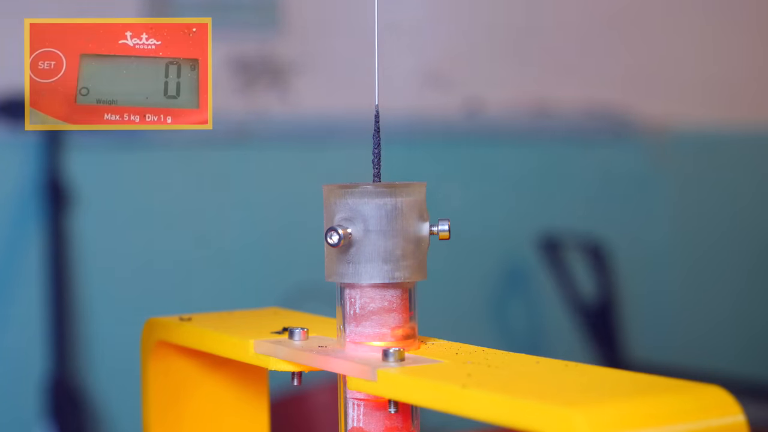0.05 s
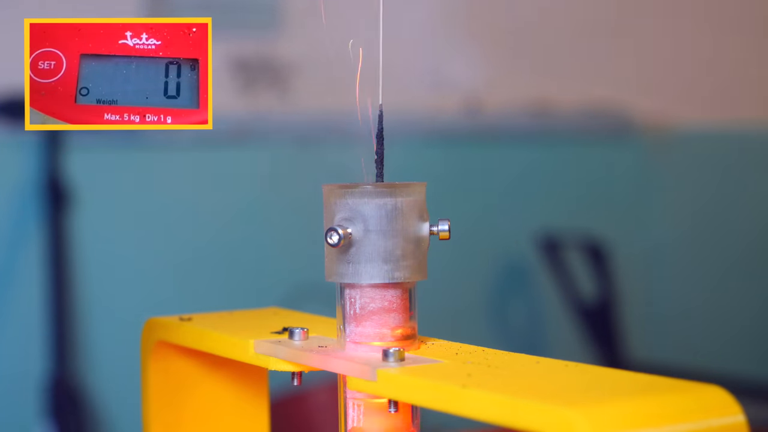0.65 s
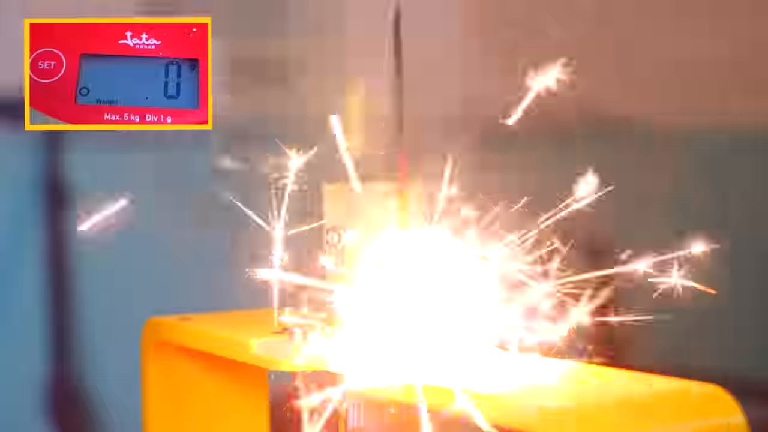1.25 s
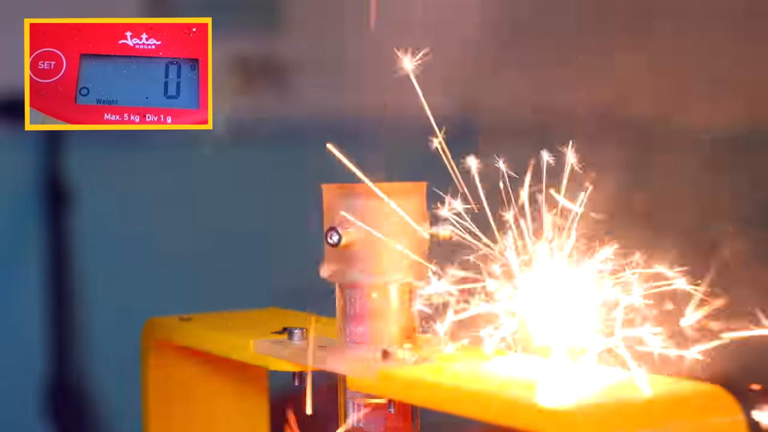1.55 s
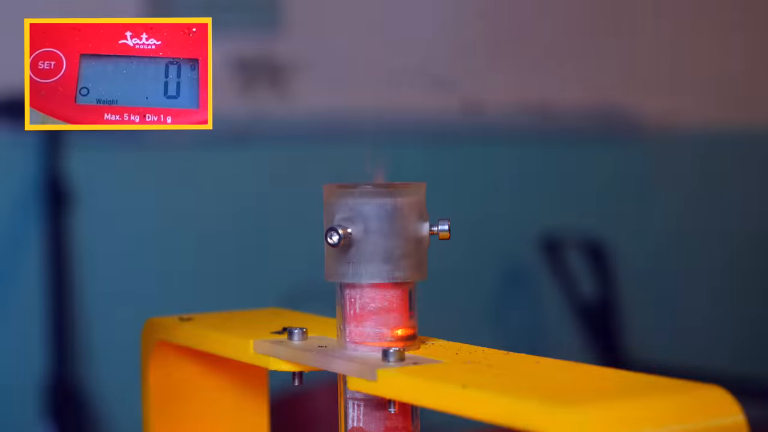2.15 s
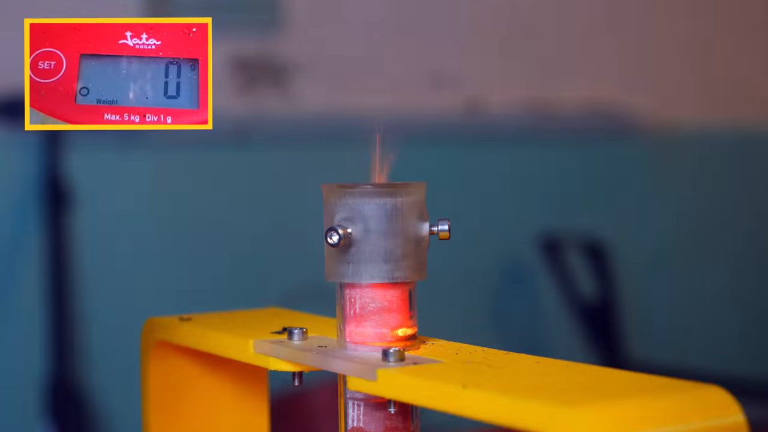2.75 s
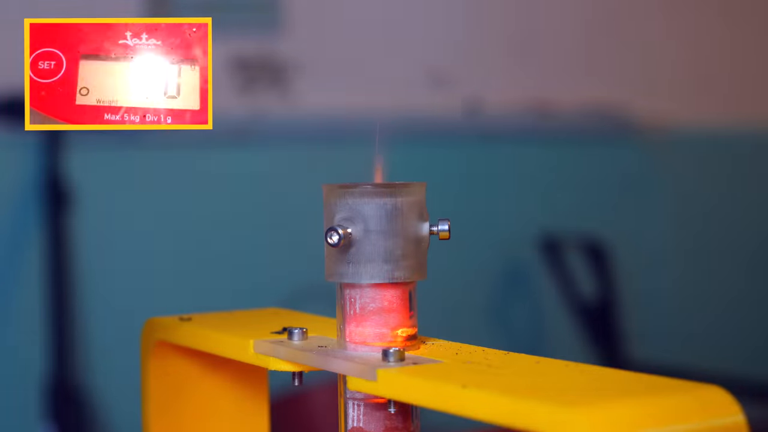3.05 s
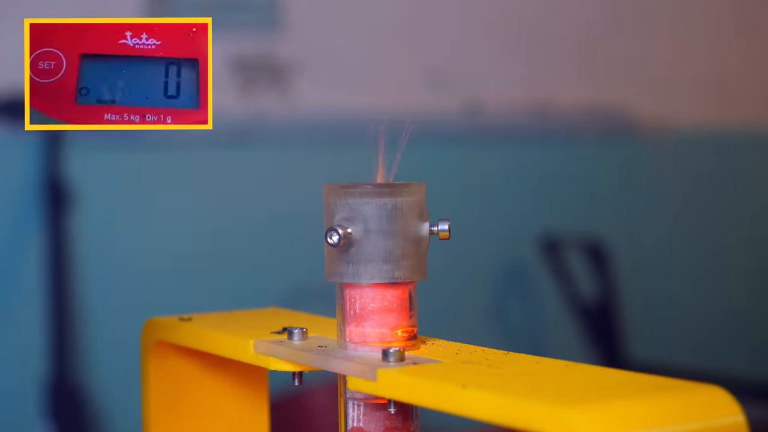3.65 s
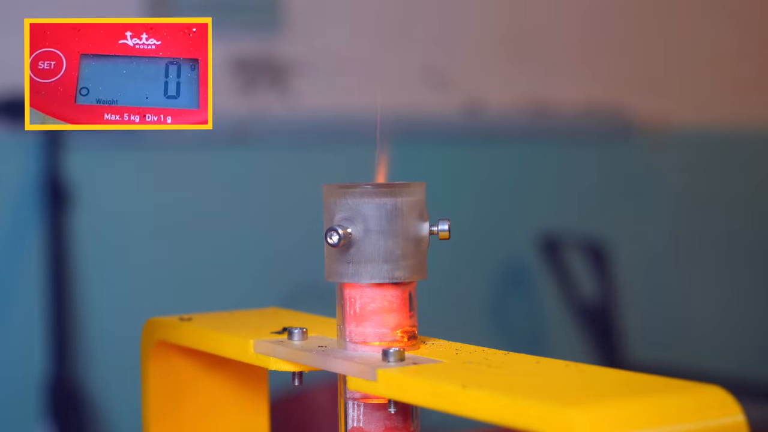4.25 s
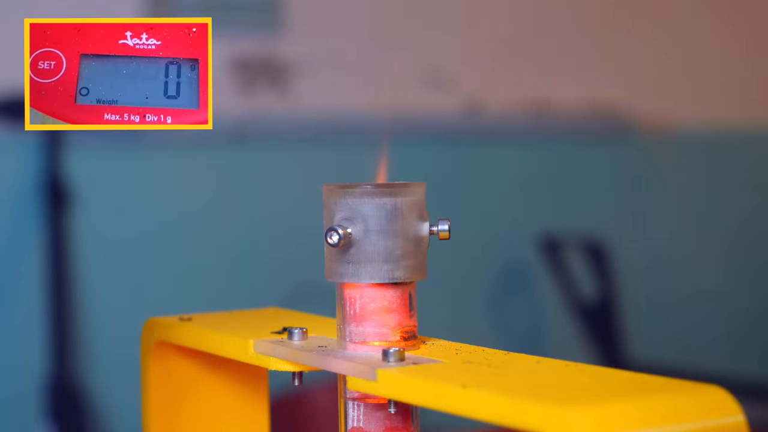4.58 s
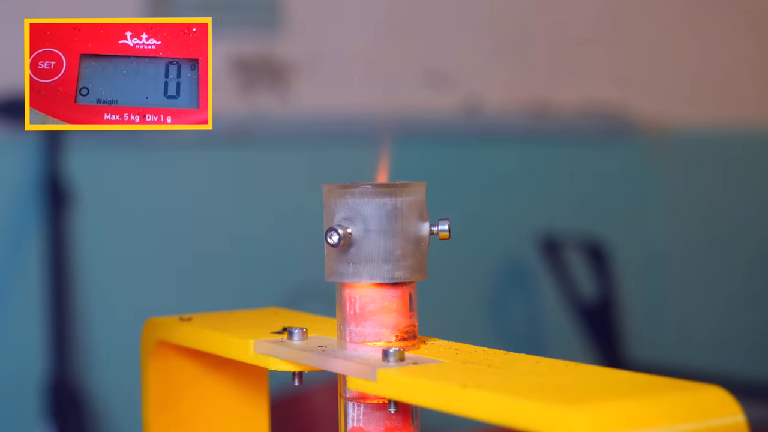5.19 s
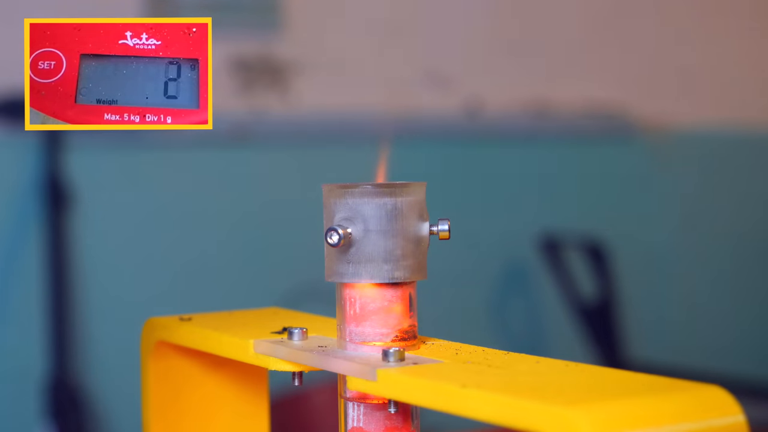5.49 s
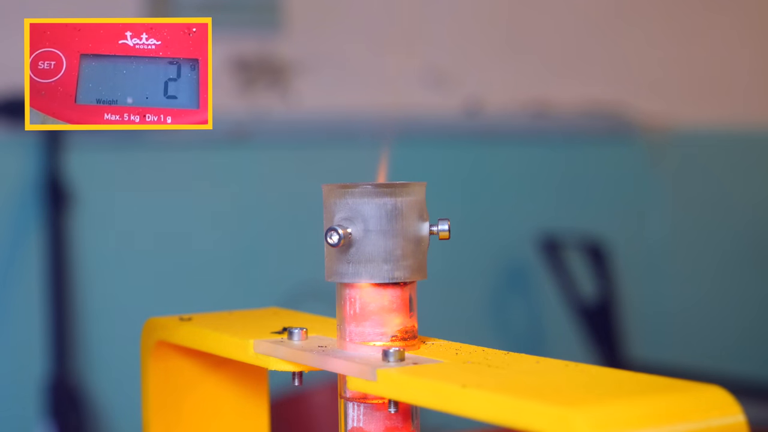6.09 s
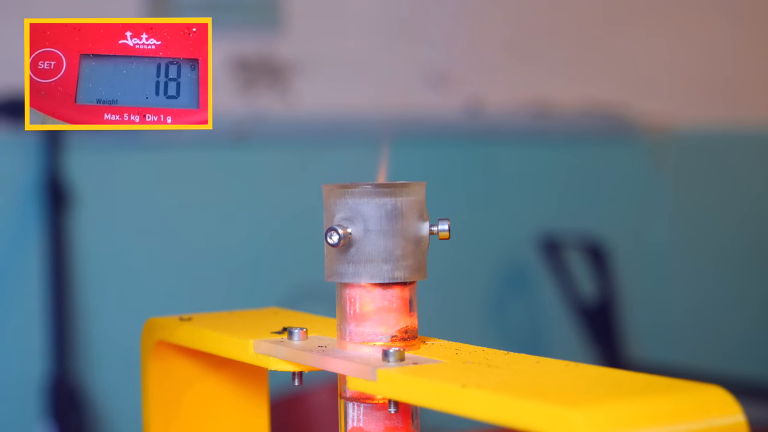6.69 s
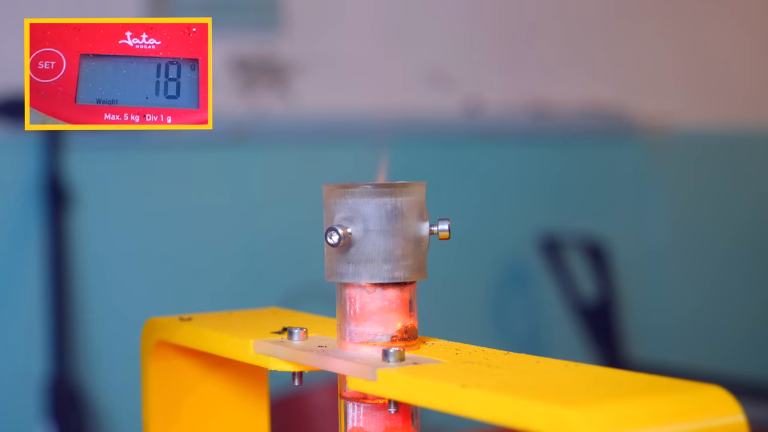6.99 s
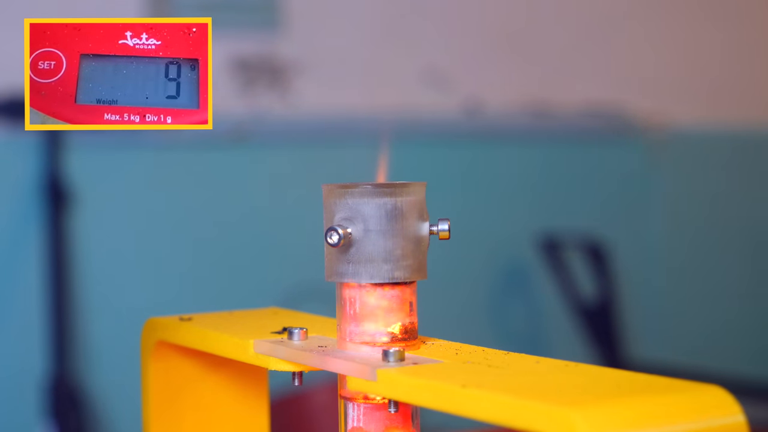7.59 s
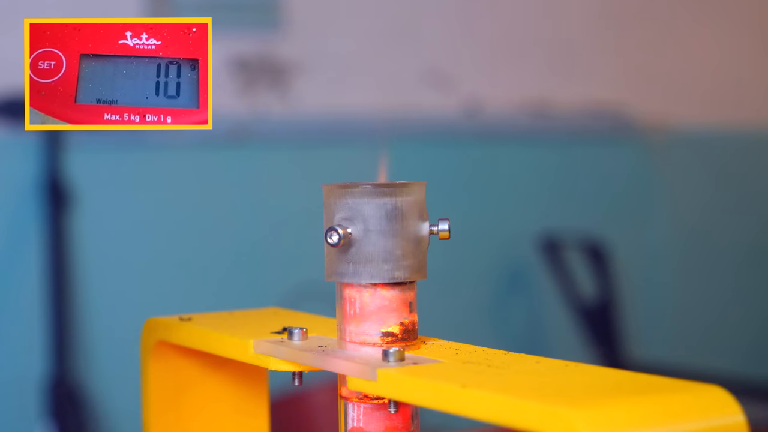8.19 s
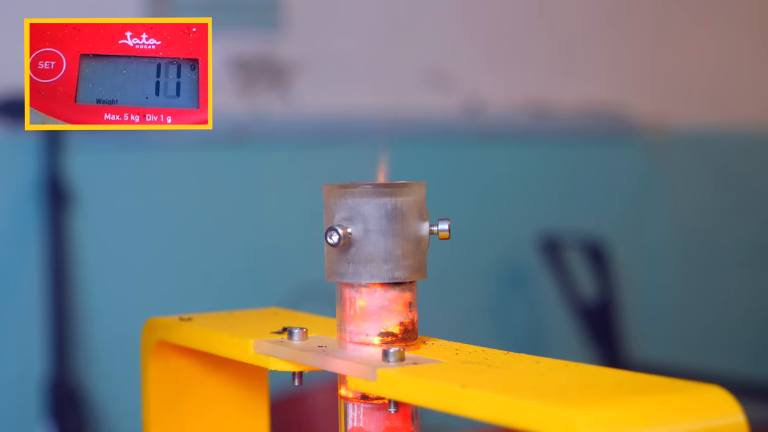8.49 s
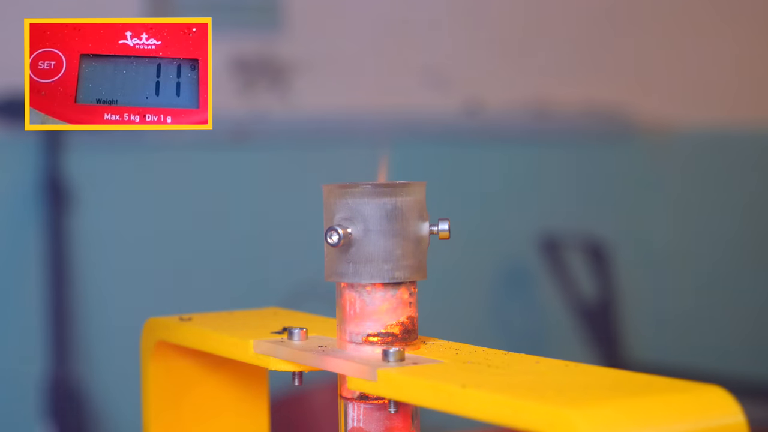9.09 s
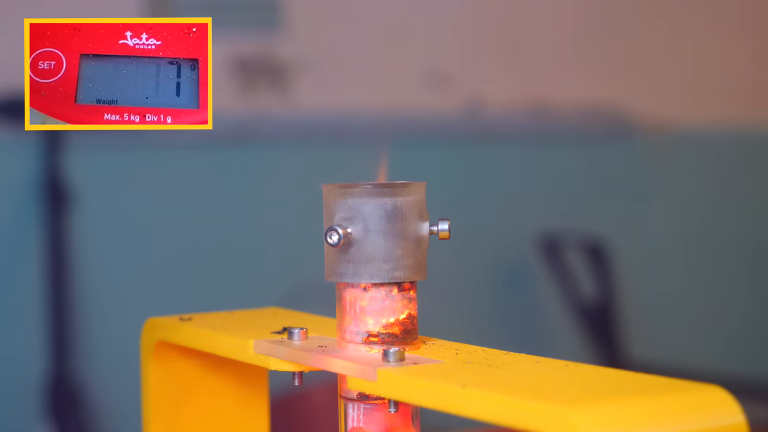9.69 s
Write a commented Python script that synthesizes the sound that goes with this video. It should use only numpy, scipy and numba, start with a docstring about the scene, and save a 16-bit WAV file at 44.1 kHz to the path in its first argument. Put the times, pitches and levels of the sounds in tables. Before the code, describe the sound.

In a workshop with a quiet machine hum, a close mono microphone picks up a spluttering fuse, a soft flutter of ignition and two small metallic ticks. The small rocket motor then burns with a hiss that grows brighter and louder, swelling and easing in slow waves. A hollow tone from the casing follows the swells, and irregular spits and sharp snaps break through.

```python
"""A small solid rocket motor burns weakly on a test stand, its jet hissing in slow surges.
Molten slag sputters and spits in the casing, whose hollow note rises with the gas flow.
Before that, a fuse fizzes down into the nozzle, the grain lights with a soft flutter,
and two bits of debris tick on the stand. The place is a humming workshop with short, weak echoes;
one microphone stands close to the motor, in mono."""
import sys
import numpy as np
from scipy import signal
from scipy.fft import rfft, irfft, next_fast_len
from scipy.io import wavfile
from scipy.ndimage import map_coordinates
from numba import njit

SR = 44100
rng = np.random.default_rng(int(sys.argv[2]) if len(sys.argv) > 2 else 0)


def store_wav(level_fs):
    """Save 16-bit WAV to argv[1]."""
    pcm = np.round(np.clip(np.atleast_2d(level_fs), -1, 1) * 32767)
    wavfile.write(sys.argv[1], SR, pcm.T.astype(np.int16))


N = 433944

# machine hum in the workshop: f/Hz, rms level/dB
MACHINE_HUM = [(59.2, -74.5), (183, -72), (306.8, -72), (399.5, -66.5), (430.7, -71.5)]
# bands where direct sound and the stand's reflections cancel: f/Hz, half width/Hz, gain/dB
STAND_DIPS = [(1800, 110, -2.5), (2500, 83, -1.5), (3060, 96, -2.5), (3650, 49, -2.5), (4770, 410, -8.5),
              (5360, 310, -6), (6434, 250, -6.5), (7800, 240, -3), (9360, 520, -4), (11550, 1140, -4),
              (14660, 430, -4)]
# debris striking the stand: t/s, relative level/dB of crack, of plate, of screw
DEBRIS_TICKS = [(1.349, -32.5, -32.5, -67.5), (1.6632, -38, -58, -36)]
# what the debris sets ringing: f/Hz, relative level/dB, t60/s
PLATE_MODES = [(1150, 4.5, 0.033), (1790, -5.5, .025), (2050, -4, .025), (3190, -1, 0.034),
               (4030, 5, 0.026)]
SCREW_MODES = [(3300, -3, .03), (6890, -4, 0.064), (8900, -5, .07)]
# fuse spurts, the last two as it flares in the nozzle: t/s, relative level/dB, half width/s
FUSE_SPURTS = [(.09, -60.5, 0.05), (.405, -51.5, 0.024), (.52, -50.5, 0.027), (.66, -49, .018),
               (.76, -53, 0.02), (.855, -45, 0.016), (.94, -45, .022), (1.07, -37.5, 0.06),
               (1.19, -43.5, 0.066)]
# gas puffs as the grain lights: t/s, relative level/dB, half width/s
IGNITION_PUFFS = [(1.1476, -29, 0.0012), (1.1584, -29, 0.0014), (1.1657, -30, 0.001), (1.18, -36, 0.0017),
                  (1.1965, -36, 0.0018), (1.207, -43, .004)]
# slag spat through the nozzle: t/s, relative level/dB of dull pop, of sharp snap
SLAG_SPITS = [(.977, -45, -50), (2.834, -34, -42), (3.024, -32, -39), (3.621, -38, -40), (3.711, -35, -36),
              (3.943, -37, -45), (4.212, -32, -45), (4.596, -26, -28), (4.604, -35, -38), (4.997, -50, -16),
              (5.052, -32, -38), (5.215, -26.5, -26), (6.035, -49, -24), (6.118, -43, -45),
              (6.869, -33, -40), (7.389, -30, -26), (7.704, -31, -40), (8.613, -42, -20), (8.625, -33, -18)]
# slow drift of the casing's note, flat and sharp: t/s, offset/Hz
NOTE_DRIFT = [(2, -4), (4.4, -90), (5.3, 50), (6.5, -130), (7.7, 18), (8.7, 55), (9.8, -22)]
# gas flow from the burning grain, driving hiss, casing note, roar and sputter: t/s, level/dB
GRAIN_FLOW = [(1.75, -45.5), (1.97, -44), (2.36, -46.5), (2.79, -41), (3.48, -39), (4.54, -28), (4.77, -31),
              (5.26, -26), (5.67, -30.5), (6.5, -26.5), (7.11, -31), (7.74, -23), (7.97, -24.5),
              (8.15, -30.5), (8.37, -33), (9.03, -31.5), (9.52, -26), (9.84, -26.5)]
# noise spectra of the sources: f/Hz, relative level/dB
ROOM_SPECTRUM = [(20, -28), (55, -2), (120, -2), (400, 2), (700, 0), (1500, -3), (4000, -3.5), (15000, -94)]
FIZZ_SPECTRUM = [(300, -14), (1000, -8.5), (1700, -4.5), (2600, 1), (3300, 2.5), (4000, -4), (5500, -1),
                 (8300, -2), (10000, -5), (15500, -14)]
ROAR_SPECTRUM = [(20, -4), (60, -4), (140, -4), (250, 1.5), (380, -1.5), (600, -4), (1300, 0), (2000, -5.5),
                 (4000, -10), (12000, -40)]
JET_SPECTRUM = [(200, -22), (900, -22), (1500, -16.5), (2300, -7.5), (3900, -0.73), (7000, 0.5), (8500, 0),
                (11000, -1), (15500, -4.5)]
CRACK_SPECTRUM = [(300, -11.5), (1200, -6), (4000, 1), (5000, -6), (10000, -9), (15000, -20)]
POP_SPECTRUM = [(60, -21), (300, 0.5), (1100, 4), (2500, -4), (8000, -30)]
SNAP_SPECTRUM = [(1000, -26), (2000, -9), (2900, 3), (3500, 0), (5000, -14), (15000, -24)]
BUBBLE_SPECTRUM = [(100, -16), (350, -11.5), (900, -8), (1600, -4.5), (2400, 5), (3800, -2),
                   (5000, -15), (12000, -17)]

CRUISE_DB = -29.5  # middling flow of the steady burn, the reference for pitch and sputter


def amp(db):
    """Decibels to gain."""
    return 10 ** (np.asarray(db) / 20)


def unit(x):
    """Scale to rms 1."""
    return x / np.sqrt(np.mean(x ** 2) + 1e-20)


def clock():
    """Time of each sample in seconds."""
    return np.arange(N) / SR


def rise(middle_s, fade_s):
    """A smooth step from 0 to 1."""
    return .5 + .5 * np.tanh((clock() - middle_s) / fade_s)


def curve(rows):
    """Join (time, value) points into one value per sample."""
    return np.interp(clock(), *np.transpose(rows))


def wobble(rate):
    """A smooth random curve, rate knots a second."""
    return map_coordinates(rng.standard_normal(int(N * rate / SR) + 4), [clock() * rate])


def filtered(x, response):
    """Filter x by a gain given as a function of frequency."""
    size = next_fast_len(N + SR // 2)
    return irfft(rfft(x, size) * response(np.fft.rfftfreq(size, 1 / SR)), size)[:N]


def coloured(x, spectrum):
    """Shape x by a spectrum table, at rms 1."""
    points_hz, db = np.transpose(spectrum)
    return unit(filtered(x, lambda hz: amp(np.interp(np.log(hz + 1), np.log(points_hz), db))))


def crackle(rate, spread_db, share):
    """White noise in which a share of the power comes as tiny bursts of uneven size."""
    fires = rng.random(N) < rate / SR
    sign = rng.choice([-1, 1], N)
    size = amp(spread_db * np.minimum(rng.standard_normal(N), 2))
    return np.sqrt(share) * unit(fires * sign * size) + np.sqrt(1 - share) * rng.standard_normal(N)


@njit
def resonate(x, angle, radius):
    """A two-pole resonance whose pitch and damping move, at steady power for white noise."""
    y, state = np.zeros(len(x)), 0j
    for i in range(len(x)):
        state = state * radius[i] * np.exp(1j * angle[i]) + x[i] * np.sqrt(1 - radius[i] ** 2)
        y[i] = state.real
    return y


def workshop(air_db=-62, waver_rad=.25):
    """Room tone: steady noise and a slightly wavering machine hum."""
    hum = sum(amp(db) * np.sqrt(2) * np.sin(2 * np.pi * hz * clock() + waver_rad * wobble(4.6))
              for hz, db in MACHINE_HUM)
    return hum + amp(air_db) * coloured(rng.standard_normal(N), ROOM_SPECTRUM)


def walls(x, echo_db=-14, t60=0.21):
    """Walls and benches scatter short echoes, well below the direct sound at this close range."""
    t = np.arange(SR // 5) / SR
    tail = rng.standard_normal(len(t)) * amp(-60 * t / t60) * (t > .003)
    return x + amp(echo_db) * signal.fftconvolve(x, tail / np.linalg.norm(tail))[:N]


def stand(x):
    """Reflections near the nozzle carve fixed dips into what reaches the microphone."""
    return filtered(x, lambda hz: amp(sum(db * np.exp(-((hz - centre) / width) ** 2)
                                          for centre, width, db in STAND_DIPS)))


def struck_metal(modes, t):
    """A struck part rings in decaying sines of random phase."""
    return sum(amp(db - 60 * t / t60) * np.sin(2 * np.pi * (hz * t + rng.random()))
               for hz, db, t60 in modes)


def debris(crack_t60=0.031):
    """Debris hits the stand: a short crack with the ring of the plate and of a screw."""
    ticks, t = np.zeros(N), np.arange(SR // 5) / SR
    grit = coloured(rng.standard_normal(N), CRACK_SPECTRUM)
    for s, crack_db, plate_db, screw_db in DEBRIS_TICKS:
        at = round(s * SR)
        crack = grit[at:][:len(t)] * amp(crack_db - 60 * t / crack_t60)
        plate = .5 * amp(plate_db) * struck_metal(PLATE_MODES, t)
        screw = amp(screw_db) * struck_metal(SCREW_MODES, t)
        ticks[at:][:len(t)] += crack + plate + screw
    return ticks


def fuse_inside():
    """Rises from 0 to 1 as the fuse burns down into the casing."""
    return rise(middle_s=1.0, fade_s=0.063)


def grain_share():
    """Share of the sound that has passed from the fuse to the grain."""
    return rise(middle_s=1.82, fade_s=0.27)


def fuse_level(first_db=-57.5, last_db=-47, start_s=0.15, full_s=0.94):
    """Strength of the fuse in dB: it grows towards the nozzle, with bell-shaped spurts on top."""
    t = clock()
    power = amp(np.interp(t, [start_s, full_s], [first_db, last_db])) ** 2
    for s, db, half_width in FUSE_SPURTS:
        power += amp(db) ** 2 * np.exp(-((t - s) / half_width) ** 2)
    return 10 * np.log10(power)


def nozzle_flow(fuse_trim_db=-1.5):
    """Gas flow through the nozzle in dB: first the fuse's, then the grain's."""
    lit = grain_share()
    return (1 - lit) * (fuse_level() + fuse_trim_db) + lit * curve(GRAIN_FLOW)


def gas(noise, flow_db, dull_db, bright_db):
    """Slow gas fizzes dully; fast gas hisses brightly."""
    bright = np.clip((flow_db - dull_db) / (bright_db - dull_db), 0, 1)
    return (1 - bright) * coloured(noise, FIZZ_SPECTRUM) + bright * coloured(noise, JET_SPECTRUM)


def whistle(start_hz=1420, end_hz=1630, start_db=-58, fall_db_per_s=50, overtone_db=-4):
    """A faint, wavering whistle rises and dies as the fuse starts."""
    t = clock()
    hz = np.interp(t, [.02, .15], [start_hz, end_hz]) + 50 * wobble(202)
    phase = 2 * np.pi * np.cumsum(hz) / SR
    tone = np.sin(phase) + amp(overtone_db) * np.sin(2 * phase)
    return tone * amp(start_db - fall_db_per_s * t + 3.6 * wobble(43))


def fuse(trim_db=-1.3, flutter_db=1.1):
    """The fuse fizzes in spurts; the harder it flares, the brighter it gets."""
    level_db = fuse_level()
    fizz = gas(crackle(rate=1900, spread_db=6.5, share=.25), level_db, dull_db=-44, bright_db=-33)
    return fizz * amp(level_db + trim_db + flutter_db * wobble(51.05)) * np.sqrt(1 - grain_share())


def ignition(trim_db=-.8):
    """The grain catches in a few puffs, each a dip of pressure between two swells."""
    pressure = np.zeros(N)
    for s, db, half_width in IGNITION_PUFFS:
        u = np.clip((clock() - s) / half_width, -10, 10)
        pressure -= amp(db + trim_db) * (1 - u * u) * np.exp(-u * u / 2)
    return pressure


def flame(idle_db=-56.5, jet_trim_db=-24, fuse_trim_db=-12, flutter_db=1.0):
    """A low, spluttering roar under the hiss: an idle flame, swelled by the fuse and by the jet."""
    lit = grain_share()
    idle_power = fuse_inside() * amp(idle_db) ** 2
    fuse_power = (1 - lit) * amp(fuse_level() + fuse_trim_db) ** 2
    jet_power = lit * amp(curve(GRAIN_FLOW) + jet_trim_db) ** 2
    roar = coloured(crackle(rate=260, spread_db=3, share=0.39), ROAR_SPECTRUM)
    return roar * np.sqrt(idle_power + fuse_power + jet_power) * amp(flutter_db * wobble(25))


def slag_load(cleared_db=-3):
    """Slag in the nozzle: it melts early in the burn, then part of it is blown clear."""
    molten = rise(middle_s=2.8, fade_s=0.31)
    cleared = rise(middle_s=5.8, fade_s=0.14)
    return molten * amp(cleared_db * cleared)


def slag_sputter(rate=55, spread_db=2.5, attack_s=0.0013, t60=0.0082, base_db=-46, growth=0.16):
    """Small slag bubbles burst at random, each a few milliseconds of noise, louder with more flow."""
    t = np.arange(SR // 20) / SR
    starts = (rng.random(N) < rate / SR) * amp(spread_db * np.minimum(rng.standard_normal(N), 1.5))
    burst = amp(-60 * t / t60) * (1 - np.exp(-t / attack_s))
    envelope = signal.fftconvolve(starts, burst)[:N]
    bubbles = coloured(envelope * rng.standard_normal(N), BUBBLE_SPECTRUM)
    return bubbles * slag_load() * amp(base_db + growth * (nozzle_flow() - CRUISE_DB))


def slag_spits(pop_trim_db=-1, attack_s=0.00087, t60=0.02):
    """Each lump of slag briefly chokes the nozzle and leaves with a pop and a snap of the casing."""
    pops, snaps, t = np.zeros(N), np.zeros(N), np.arange(SR // 10) / SR
    burst = amp(-60 * t / t60) * (1 - np.exp(-t / attack_s))
    for s, pop_db, snap_db in SLAG_SPITS:
        at = round(s * SR)
        pops[at:][:len(t)] += amp(pop_db + pop_trim_db) * burst
        snaps[at:][:len(t)] += amp(snap_db) * burst
    dull = coloured(rng.standard_normal(N), POP_SPECTRUM)
    sharp = coloured(rng.standard_normal(N), SNAP_SPECTRUM)
    return pops * dull + snaps * sharp


def casing(note_hz=3117, hz_per_db=65, trim_db=-2.5, unlit_db=-6, blowout_db=-27, blowout_slope=3.6):
    """Bursting slag bubbles ring the casing; faster flow raises the note, damps it and blows it out."""
    flow_db = nozzle_flow()
    hz = note_hz + hz_per_db * (flow_db - CRUISE_DB) + curve(NOTE_DRIFT)
    width_hz = np.interp(hz, [2050, 2450], [460, 900])
    wander = 1 + 0.023 * wobble(24)  # slag shifting in the throat
    angle = 2 * np.pi * hz * wander / SR
    radius = np.exp(-np.pi * width_hz / SR)
    boil = crackle(rate=950, spread_db=5, share=0.32) * amp(wobble(140))
    ring = resonate(boil, angle, radius) * np.sqrt(1 - radius)
    ring = resonate(ring, angle, radius)  # a second pass steepens the skirts
    level_db = flow_db + trim_db + unlit_db * (1 - grain_share())
    blowout = np.hypot(1, amp(blowout_slope * (flow_db - blowout_db)))
    return unit(ring) * amp(level_db) * fuse_inside() / blowout


def jet(trim_db=2.5, flutter_db=0.47, rough_db=.5):
    """Gas tears out of the nozzle in a slightly unsteady hiss that brightens with the flow."""
    flow_db = curve(GRAIN_FLOW)
    hiss = gas(crackle(rate=4000, spread_db=1.5, share=0.088), flow_db, dull_db=-52, bright_db=-32)
    unsteady_db = flutter_db * wobble(22) + rough_db * wobble(300)
    return hiss * amp(flow_db + trim_db + unsteady_db) * np.sqrt(grain_share())


def scene():
    """One microphone near the test stand picks up motor and workshop and feeds both channels."""
    nozzle = amp(1.28) * stand(fuse() + jet() + casing() + slag_sputter())
    motor = nozzle + flame() + slag_spits() + whistle()
    mono = walls(motor) + ignition() + debris() + workshop()
    return np.array([mono, mono])


def record(dry, low_cut_hz=22, top_hz=15750):
    """The camera's microphone sheds the deepest bass and keeps nothing above its band limit."""
    def response(hz):
        return (hz < top_hz) * hz ** 2 / (hz ** 2 + low_cut_hz ** 2)
    return np.array([filtered(channel, response) for channel in dry])


dry = scene()
out = record(dry)
store_wav(out)
```